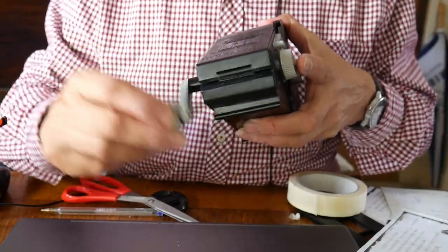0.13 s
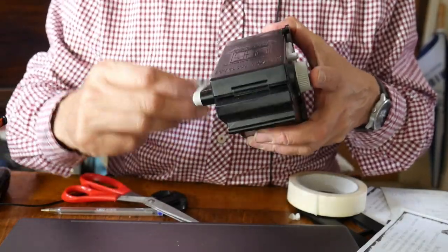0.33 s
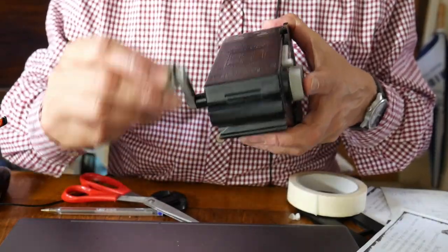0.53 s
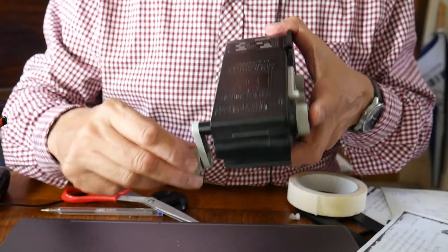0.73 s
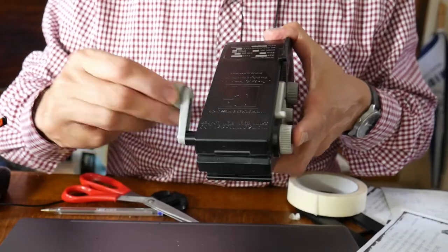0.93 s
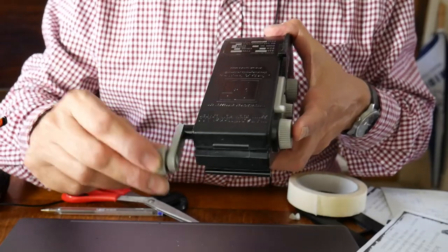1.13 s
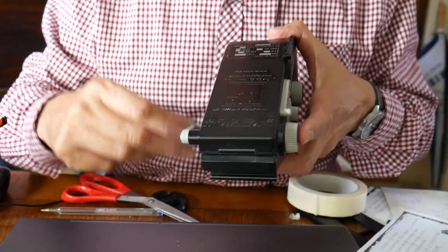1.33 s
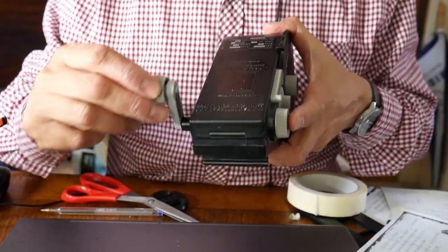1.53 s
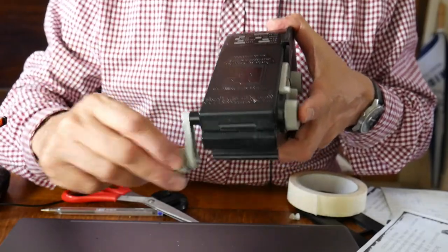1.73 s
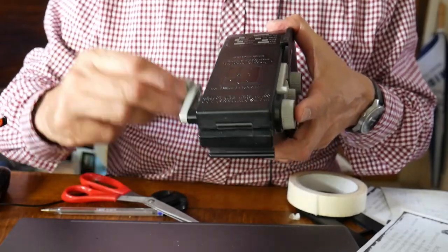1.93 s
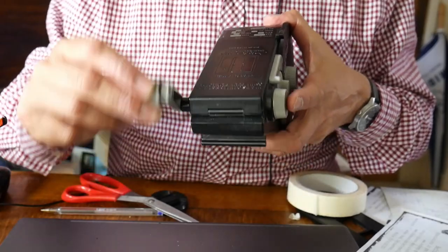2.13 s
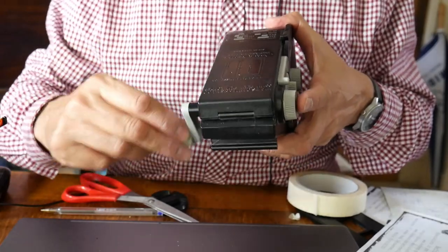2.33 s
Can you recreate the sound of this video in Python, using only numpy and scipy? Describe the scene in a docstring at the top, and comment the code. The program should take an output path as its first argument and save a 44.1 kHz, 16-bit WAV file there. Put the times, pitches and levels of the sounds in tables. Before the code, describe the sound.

A hand-cranked plastic film loader gives six sharp snaps, at about 0.2, 0.6, 1.0, 1.4, 1.8 and 2.2 seconds. Each follows a brief gritty scrape, overloads the close microphone and rings shortly in a small room. Between the snaps come soft film sliding, dull crank knocks, tiny ticks and a hand rubbing the case. A faint, wavering low hum lies underneath until the end at 2.5 seconds.

```python
"""Six sharp plastic snaps, about 0.4 s apart: a hand-held film loader cranked close up in a small room.
Once per turn the frame counter's pawl scrapes up its tooth and snaps off, ringing the case and
overloading the microphone. Between snaps the film slides, crank and spool knock softly, the mechanism
ticks and a hand rubs the case. Underneath lie a faint, wavering low hum and the air of the room."""
import sys
import numpy as np
from scipy import signal
from scipy.fft import rfft, irfft
from scipy.io import wavfile

SR = 44100
rng = np.random.default_rng(int(sys.argv[2]) if len(sys.argv) > 2 else 0)


def transcribe(signal):
    """Save signal, clipped to [-1, 1], as a 16-bit WAV file at the path in sys.argv[1]."""
    frames = np.atleast_2d(signal).T
    limited = np.clip(frames, -1, 1)
    pcm = np.round(limited * 32767).astype(np.int16)
    wavfile.write(sys.argv[1], SR, pcm)


N = 110250

# The pawl's snaps. Each row: start in seconds; ring, thump, mid crack and high crack in dB; case pitch
# ratio; rebound delay in seconds; rebound in dB against the ring; room tail trim in dB.
SNAPS = [(0.2117, 0.5, -17, -7, -4.5, 1.0, .0028, -9.5, 1),
         (0.6138, 2, -24.5, -11.5, -7, 1.0, 0.003, -27, 1),
         (1.0105, 3.5, -15.5, -16.5, -7, 1.01, 0.0028, -11, -1),
         (1.3957, 1, -13.5, -15.5, -6.5, 1.0, 0.0037, -15, -1),
         (1.789, 1.5, -26.5, -14.5, -8.5, .99, 0.0013, -21, -0.5),
         (2.2074, 0, -44, -14.5, -8, 1.0, 0.003, -28, -1.5)]
# The ring of pawl and case. Each row: pitch in Hz, relative level in dB, seconds to fall 60 dB.
CASE_MODES = [(1440, -29, 0.071), (1687, -27, 0.061), (2266, -14.5, 0.0079), (3230, -17, 0.019),
              (3504, -21.5, 0.034), (4030, -9.5, 0.024), (4634, -4.5, 0.01), (5533, 0, 0.013),
              (5847, -4, 0.013), (7067, -13, 0.013), (8520, -25, 0.0054), (9770, -16.5, 0.0058),
              (12030, -28, 0.0081), (12900, -24, 0.0068)]
# The pawl catching and slipping. Each row: start and decay in seconds, then low, mid and high in dB.
SLIPS = [(.170, 0.0045, -37, -32, -39), (.178, 0.0037, -39, -33, -42), (.186, 0.0056, -23.5, -37, -33.5),
         (.206, 0.0088, -33, -19.5, -21), (.564, 0.0074, -37, -33, -39), (.572, 0.0073, -39, -43, -49),
         (.586, 0.0084, -37.5, -62, -45), (.607, 0.011, -34.5, -22, -26.5), (.941, 0.0074, -52, -42, -60),
         (.956, 0.0071, -46, -41.5, -59), (1.001, 0.0065, -40, -24.5, -31),
         (1.314, 0.0082, -36, -39.5, -59), (1.348, 0.0013, -32, -23.5, -35), (1.357, 0.0058, -37, -36, -36),
         (1.3855, 0.0082, -37, -22, -27), (1.745, 0.0051, -33.5, -31.5, -44),
         (1.754, .004, -35, -38, -36.5), (1.776, 0.013, -31, -30, -38), (2.166, 0.0025, -41, -29, -44),
         (2.175, 0.0045, -39, -33, -33), (2.196, 0.016, -41.5, -34, -36.5)]
# Knocks of crank and spool, and ticks of the mechanism. Each row: start in seconds, level in dB.
KNOCKS = [(.116, -49), (.311, -40.5), (.346, -41.5), (.418, -39), (.501, -44), (.686, -35), (.715, -38),
          (.762, -42), (.795, -43), (1.1, -48), (1.25, -52), (1.52, -44.5), (1.603, -44), (1.976, -43.5),
          (2.324, -40), (2.455, -47)]
TICKS = [(.464, -43), (.500, -44), (.836, -37.5), (2.05, -52), (2.192, -27)]
# The hand shifting its grip. Each row: start in seconds, length in seconds, level in dB.
RUBS = [(.37, 0.08, -53.5), (.63, 0.22, -53.5), (1.21, 0.14, -47), (1.68, 0.063, -51)]
# Fader moves for the film, the hum and its octave. Each row: time in seconds, level in dB.
FILM_FADER = [(0, -53.5), (.15, -45.5), (.3, -46.5), (.44, -52), (.55, -45), (.7, -48.5), (.85, -49.5),
              (.98, -47), (1.2, -54.5), (1.33, -44.5), (1.56, -56.5), (1.72, -46.5), (1.92, -53),
              (2.05, -52), (2.15, -46.5), (2.38, -52), (2.45, -49.5), (2.5, -51)]
HUM_FADER = [(0, -37.5), (.06, -36), (.12, -50), (.19, -26.5), (.24, -45), (.31, -37), (.39, -48),
             (.45, -37.5), (.53, -52), (.59, -37), (.66, -45.5), (.88, -36.5), (1.04, -44.5), (1.34, -44.5),
             (1.45, -57), (1.7, -45.5), (1.82, -50), (1.96, -37.5), (2.1, -51.5), (2.2, -50.5), (2.5, -48)]
OCTAVE_FADER = [(0, -48.5), (.35, -61), (.45, -52), (.5, -53), (.6, -52), (.65, -51), (.8, -47), (.99, -41),
                (1.04, -60), (1.1, -46.5), (1.34, -46), (1.43, -63.5), (1.62, -50.5), (1.8, -57),
                (1.92, -56), (2.04, -65), (2.19, -45.5), (2.25, -67.5), (2.5, -60)]
# The hum's drifting pitch. Each row: time in seconds, pitch in Hz.
HUM_PITCH = [(0, 46.3), (.3, 44.56), (.6, 46.27), (1, 45.83), (1.4, 45.3), (1.9, 43.14), (2.2, 44.26),
             (2.5, 42.6)]

# The tone colour of each noise layer. Each row: frequency in Hz, relative spectral level in dB.
CRACK_EQ = [(200, -26), (900, -7), (1400, -1.5), (2700, -6.5), (4200, 4), (5800, -3.5), (6400, -1.5),
            (11500, -1), (14000, -11), (16000, -21)]
SLIP_EQ = [(100, -26), (250, -3), (500, 3), (900, -2.5), (1500, 3), (2400, -1), (3400, -4.5), (5500, -7),
           (7000, -20.5), (11000, -23.5), (16000, -36)]
KNOCK_EQ = [(100, -21), (280, 2.5), (400, -12), (580, 8.5), (850, -11), (1400, -15.5), (2500, -19),
            (5000, -35), (12000, -64)]
TICK_EQ = [(1000, -21), (4000, -9), (6500, -1), (10000, -3), (13000, -20)]
RUB_EQ = [(100, -9), (220, -5), (290, 6), (360, -16), (470, 5), (700, -21), (1600, -10), (4000, -42)]
FILM_EQ = [(150, 1.5), (300, 1.5), (600, 1.5), (900, -1), (1400, -1), (2200, -8), (3200, -6), (4500, -2),
           (5600, -4.5), (6700, -13.5), (10000, -14.5), (16000, -25.5)]
ROOM_EQ = [(150, -16), (700, -11), (1100, -2), (1650, -3.5), (2400, -1.5), (3500, 2.5), (4700, 3.5),
           (5800, 2), (6500, -2.5), (10000, -2), (12500, -4), (14000, -10), (16000, -25)]
AIR_EQ = [(20, 11.5), (45, 7.5), (70, 7.5), (130, -5), (300, -3.5), (700, -6.5), (2000, -15), (5000, -25),
          (11000, -16), (16000, -30)]
HISS_EQ = [(12, -50), (20, -13), (377, -5.5), (1120, -10), (1860, -9), (2910, -12.5), (10200, -11),
           (14300, -15), (16000, -30)]
# How long the room rings. Each row: frequency in Hz, seconds to fall 60 dB.
ROOM_DECAY = [(200, 0.27), (1000, 0.41), (2000, 0.3564), (5000, 0.39), (8000, 0.3355), (15000, 0.24)]
# Case resonances that colour the room tail. Each row: centre in Hz, width in Hz, boost or cut in dB.
TAIL_RESONANCES = [(1410, 38, 3.5), (1700, 88, 6), (4150, 64, -3), (4660, 130, 4), (5900, 270, 2)]
# Stereo width from the two capsules' phase mismatch. Each row: frequency in Hz, side gain in dB.
CAPSULE_MISMATCH = [(40, -43), (300, -43), (1000, -39), (2500, -64), (5500, -42.5), (9000, -37.5),
                    (14000, -21)]

LOW_SPLIT_HZ, HIGH_SPLIT_HZ = 920, 3680  # crossovers between the low, mid and high bands
CRACK_RISE_S, CRACK_HOLD_S, CRACK_FALL_S = 0.00056, 0.0011, 0.0014
RATTLE_DB, RATTLE_FALL_S, THUMP_S = -12, 0.0041, 0.00026
RING_RISE_S, RING_SCATTER_DB, RING_DETUNE = 0.00058, 0.6, 0.0054
ROOM_ONSET_S, ROOM_RIPPLE_DB, ROOM_RIPPLE_S = 0.0032, 2, 0.0087
SNAP_TAIL_DB, HANDLING_SEND_DB, EARLY_DB, AIR_DB, HISS_DB = 3, -11, -17, -53, -70


def pawl_snap(ring_db, thump_db, mid_db, high_db, pitch, rebound_s, rebound_db, size=2048):
    """The pawl lands: a thump, a crack with a brief rattle, the ringing case and one rebound."""
    t = np.arange(size) / SR
    burst = np.exp(-np.maximum(t - CRACK_HOLD_S, 0) / CRACK_FALL_S)
    rattle = amp(RATTLE_DB) * np.exp(-t / RATTLE_FALL_S)
    envelope = np.minimum(t / CRACK_RISE_S, 1) * (burst + rattle)
    crack = amp(mid_db) * noise(CRACK_EQ, size, LOW_SPLIT_HZ, HIGH_SPLIT_HZ)
    crack += amp(high_db) * noise(CRACK_EQ, size, HIGH_SPLIT_HZ)
    age = t / THUMP_S
    thump = np.e * amp(thump_db) * age * (2 - age) * np.exp(-age)  # one push, then a shallow pull
    snap = amp(ring_db) * case_ring(t, pitch) + envelope * crack + thump
    add(snap, rebound_s, amp(ring_db + rebound_db) * case_ring(t, pitch))
    return snap


def case_ring(t, pitch):
    """The plastic case's modes die away after one blow; no two blows ring quite alike."""
    hz, db, t60 = np.transpose(CASE_MODES)[:, :, None]
    scatter, detune = rng.standard_normal((2, len(CASE_MODES), 1))
    polarity = (-1) ** np.arange(len(CASE_MODES))[:, None]
    envelopes = amp(db + RING_SCATTER_DB * scatter) * np.exp(-np.log(1000) * t / t60)
    tones = np.sin(2 * np.pi * hz * pitch * (1 + RING_DETUNE * detune) * t)
    return np.minimum(t / RING_RISE_S, 1) * (polarity * envelopes * tones).sum(0)


def pawl_slip(fall_s, low_db, mid_db, high_db, size=4096):
    """A short, gritty scrape of the pawl on its tooth, leading into the snap."""
    low = amp(low_db) * noise(SLIP_EQ, size, hi_hz=LOW_SPLIT_HZ)
    mid = amp(mid_db) * noise(SLIP_EQ, size, LOW_SPLIT_HZ, HIGH_SPLIT_HZ)
    high = amp(high_db) * noise(SLIP_EQ, size, HIGH_SPLIT_HZ)
    grit = amp(wander(size, rate_hz=820))
    return (low + mid + high) * strike(size, rise_s=0.004, fall_s=fall_s) * grit


def crank_knock(db, size=4096):
    """A dull knock of the crank in its bearing."""
    return amp(db) * noise(KNOCK_EQ, size) * strike(size, rise_s=0.0018, fall_s=0.0079)


def mechanism_tick(db, size=1024):
    """A tiny, bright tick from inside the mechanism."""
    return amp(db) * noise(TICK_EQ, size) * strike(size, rise_s=0.00033, fall_s=0.00087)


def grip_rub(length_s, db, size=16384):
    """The hand drags on the case: a muffled rub that swells and fades."""
    swell = np.sin(np.pi * np.minimum(np.arange(size) / SR / length_s, 1))
    return amp(db) * noise(RUB_EQ, size) * swell


def film_slide():
    """Uneven, grainy friction of the film winding on."""
    flutter_db = 1.5 * wander(N, rate_hz=59)
    grain_db = 0.5 * wander(N, rate_hz=1200)
    return amp(curve(FILM_FADER)) * unit(noise(FILM_EQ, N) * amp(flutter_db + grain_db))


def low_hum():
    """A low tone and its octave, swelling and wavering."""
    phase = 2 * np.pi * (np.cumsum(curve(HUM_PITCH)) / SR + rng.random())
    waver_db = 1.7 * wander(N, rate_hz=21.8)
    fundamental = amp(curve(HUM_FADER) + waver_db) * np.sin(phase)
    octave = amp(curve(OCTAVE_FADER)) * np.sin(2 * phase)
    return np.sqrt(2) * (fundamental + octave)


def early_reflections(sound, size=2048):
    """Quick echoes off the hands and the table top."""
    echoes = rng.standard_normal(size) * strike(size, rise_s=0.0017, fall_s=0.0054)
    return amp(EARLY_DB) * signal.fftconvolve(sound, echoes / np.linalg.norm(echoes))


def room_tail(size=24576):
    """The room's diffuse answer to one click of the case, energy 1; the mids ring longest."""
    t = np.arange(size) / SR
    hz = np.fft.rfftfreq(size, 1 / SR)
    case_db = sum(db / (1 + (2 * (hz - centre) / width) ** 2) for centre, width, db in TAIL_RESONANCES)
    ripple_db = ROOM_RIPPLE_DB * unit(rfft(rng.standard_normal(size) * np.exp(-t / ROOM_RIPPLE_S)).real)
    wash = irfft(rfft(noise(ROOM_EQ, size)) * amp(case_db + ripple_db), size)
    band_hz, frame_s, bands = signal.stft(wash, SR, nperseg=256)
    bands *= np.exp(-np.log(1000) * frame_s / at_hz(ROOM_DECAY, band_hz)[:, None])
    fade_in = np.minimum(t / ROOM_ONSET_S, 1) ** 2
    tail = signal.istft(bands, SR, nperseg=256)[1][:size] * fade_in
    return tail / np.linalg.norm(tail)


def room_air():
    """A steady, bass-heavy bed of room tone."""
    return amp(AIR_DB) * noise(AIR_EQ, N)


def capsules(mid):
    """Two capsules, nearly mono: only their phase mismatch and hiss set left apart from right."""
    quarter_turn = signal.hilbert(mid).imag  # every frequency shifted by 90 degrees
    mismatch = amp(at_hz(CAPSULE_MISMATCH, np.fft.rfftfreq(N, 1 / SR)))
    side = irfft(rfft(quarter_turn) * mismatch, N) + amp(HISS_DB) * noise(HISS_EQ, N)
    return np.array([mid + side, mid - side])


def noise(eq, size, lo_hz=1, hi_hz=SR):
    """Noise of a given colour within a band, rms 1."""
    hz = np.fft.rfftfreq(size, 1 / SR) + 1
    band = 1 / np.sqrt((1 + (lo_hz / hz) ** 8) * (1 + (hz / hi_hz) ** 8))
    phases = np.exp(2j * np.pi * rng.random(len(hz)))
    return unit(irfft(amp(at_hz(eq, hz)) * band * phases, size))


def wander(size, rate_hz):
    """Random drift up to a given rate, rms 1."""
    slow = np.fft.rfftfreq(size, 1 / SR) < rate_hz
    return unit(irfft(rfft(rng.standard_normal(size)) * slow, size))


def strike(size, rise_s, fall_s):
    """A percussive envelope: linear attack, exponential release."""
    t = np.arange(size) / SR
    return np.clip(t / rise_s, 0, 1) * np.exp(-np.maximum(t - rise_s, 0) / fall_s)


def curve(points):
    """An automation lane, sample by sample."""
    return np.interp(np.arange(N) / SR, *np.transpose(points))


def at_hz(points, hz):
    """A table's value at each frequency, on a log-frequency axis."""
    point_hz, values = np.transpose(points)
    return np.interp(np.log(hz + 1), np.log(point_hz), values)


def add(bus, start_s, sound):
    """Drops a sound onto a bus at its cue."""
    part = bus[round(start_s * SR):][:len(sound)]
    part += sound[:len(part)]


def amp(db):
    return 10 ** (np.asarray(db) / 20)


def unit(x):
    return x / np.sqrt(np.mean(x ** 2) + 1e-20)


def scene():
    """The mix: snaps up front, small handling sounds behind, then film, hum and air."""
    snaps, handling = np.zeros((2, N))
    for start_s, *blow, tail_trim_db in SNAPS:
        snap = pawl_snap(*blow)
        add(snaps, start_s, snap)
        add(snaps, start_s, early_reflections(snap))
        add(snaps, start_s, amp(SNAP_TAIL_DB + tail_trim_db) * room_tail())
    for cues, source in (SLIPS, pawl_slip), (KNOCKS, crank_knock), (TICKS, mechanism_tick), (RUBS, grip_rub):
        for start_s, *settings in cues:
            add(handling, start_s, source(*settings))
    handling += amp(HANDLING_SEND_DB) * signal.fftconvolve(handling, room_tail())[:N]
    return capsules(snaps + handling + film_slide() + low_hum() + room_air())


def record(dry):
    """The snaps overload the microphone and clip hard; a low-pass then trims the top at 16 kHz."""
    clipped = np.clip(dry * amp(-1), -0.94, 0.94)
    low_pass = signal.firwin(511, 16000, window=("kaiser", 8), fs=SR)
    return signal.oaconvolve(clipped, low_pass[None], "same")


dry = scene()
out = record(dry)
transcribe(out)
```